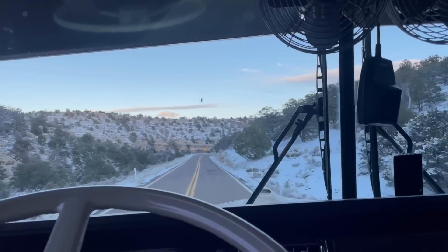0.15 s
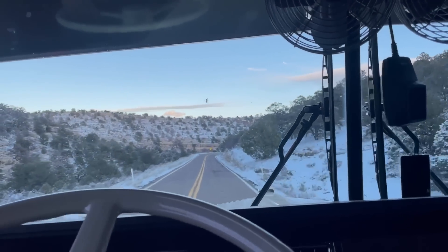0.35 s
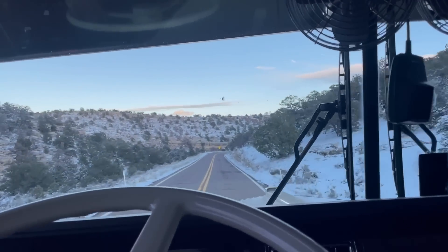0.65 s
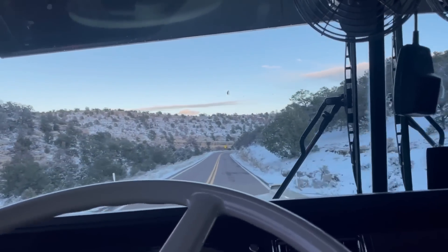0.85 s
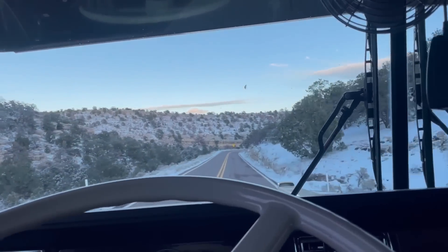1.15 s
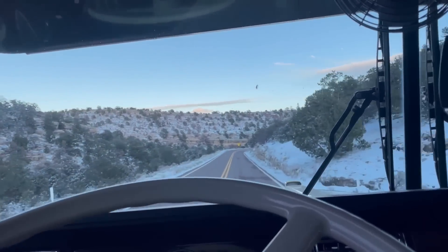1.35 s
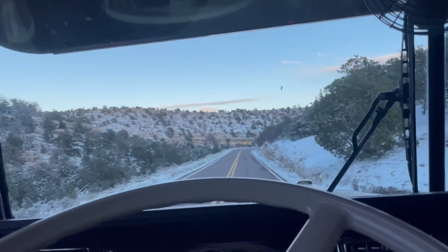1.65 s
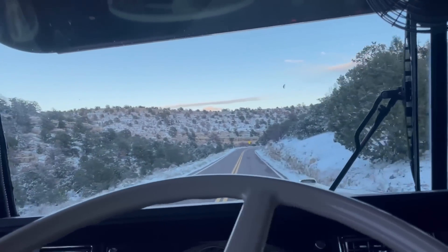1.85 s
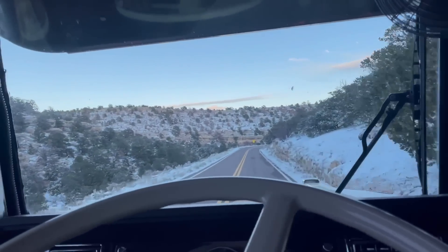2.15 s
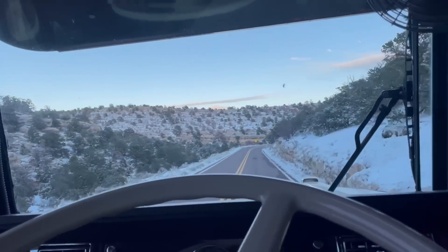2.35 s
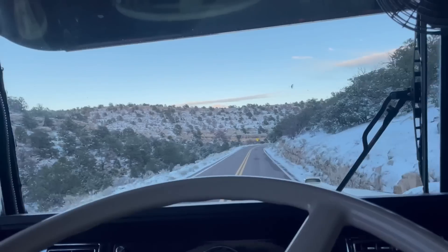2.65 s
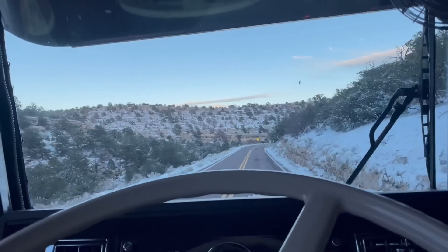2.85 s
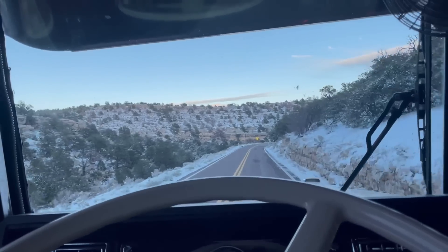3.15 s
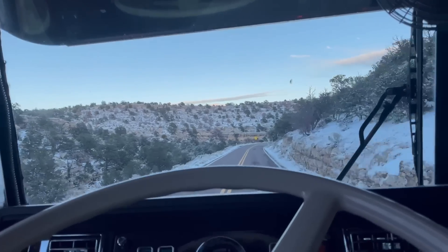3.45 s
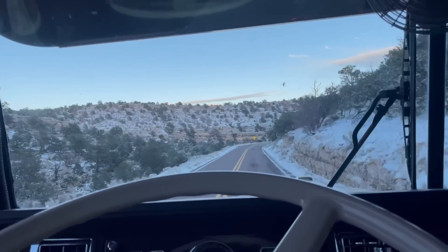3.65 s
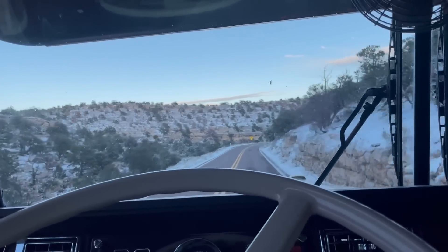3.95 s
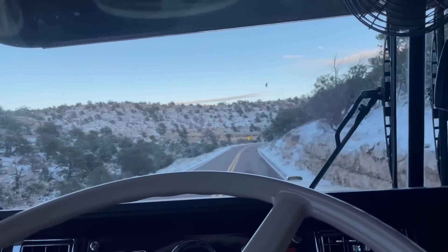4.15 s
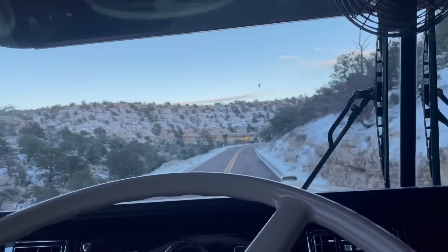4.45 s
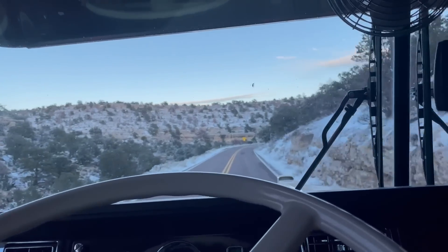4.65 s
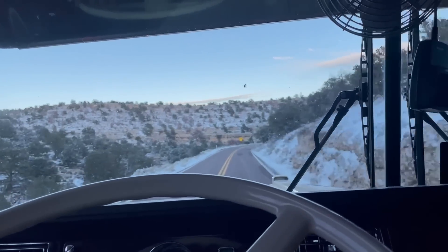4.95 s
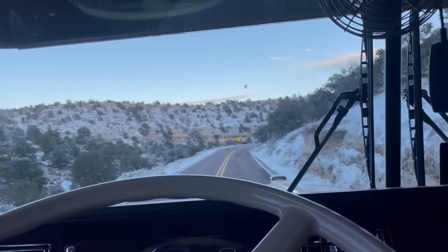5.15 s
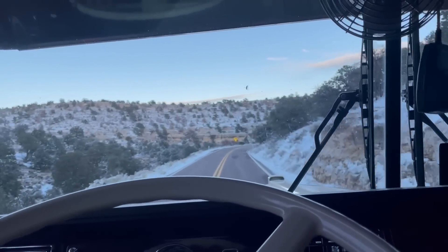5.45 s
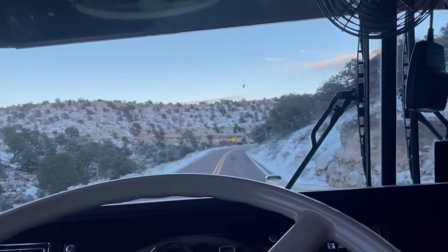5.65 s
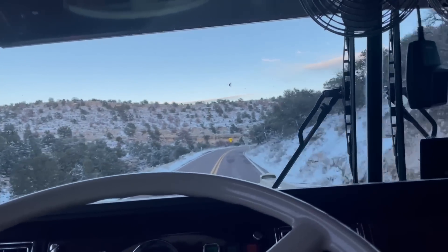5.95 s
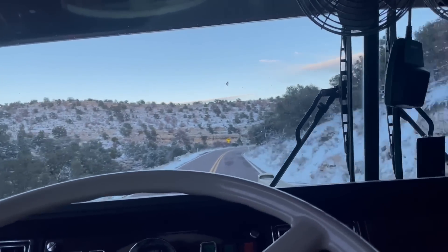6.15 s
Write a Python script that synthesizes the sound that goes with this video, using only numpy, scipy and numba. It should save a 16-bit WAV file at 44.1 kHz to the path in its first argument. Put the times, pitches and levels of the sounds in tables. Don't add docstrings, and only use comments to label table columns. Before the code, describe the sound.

Close stereo perspective inside an enclosed truck cab on a road. The loaded diesel hums deeply, then the throttle closes and the sound sinks to dull rolling noise, with joints gently rocking the cab. A brief gas hiss leads suddenly into the compression brake: rapid, uneven, metallic barking with thumps beneath, dipping slightly midway, then holding strong until it cuts off.

```python
import sys
import numpy as np
from scipy import signal
from scipy.fft import rfft, irfft
from scipy.io import wavfile
from scipy.ndimage import uniform_filter1d
from numba import njit

SR = 44100
rng = np.random.default_rng(int(sys.argv[2]) if len(sys.argv) > 2 else 0)


def invert_db(level):
    return 10 ** (np.asarray(level, dtype=float) / 20)


def materialize(psi):
    bounded = np.clip(np.atleast_2d(psi).T, -1, 1)
    quanta = np.round(bounded * 32767).astype(np.int16)
    wavfile.write(sys.argv[1], SR, quanta)


N = 277830
T = np.arange(N) / SR
HZ = np.fft.rfftfreq(N, 1 / SR)

# time in seconds, engine cycles turned (six firings a cycle).
CRANK = [
    (0, -50.58),
    (.5, -44.73),
    (1.5, -32.97),
    (4.1937, -1),
    (4.5293, 3),
    (4.866, 7),
    (5.204, 11),
    (5.5435, 15),
    (5.8845, 19),
    (6.3131, 24),
]
# time in seconds, level in dB under full.
LOAD = [
    (0, 0.5),
    (.55, -1.5),
    (1.0, -3),
    (1.5, -3.5),
    (1.7, -11.5),
    (2.0, -20),
    (4.2, -14),
    (4.35, -4),
    (4.5, -1.5),
    (6.3, -0.5),
]
# time in seconds, level in dB.
BRAKE_PRESSURE = [
    (4.25, -7.5),
    (4.33, -1.5),
    (4.55, -1),
    (5.15, -5),
    (5.6, -4.5),
    (6.3, -3),
]
# thump in dB, blast in dB, crack in dB, change as the brake warms
# in dB, lag through the manifold branch in ms.
CYLINDERS = [
    (1, 0, 0, 2.1, 0.066),
    (-4.5, 0, 3, 1.5, 0.21),
    (-1.5, -5.5, -17.5, -3.6, -0.24),
    (-16, -18.5, -22, 0.5, 0.73),
    (-1.5, 0.5, 4, -9.5, 0.15),
    (-3.5, -2, 2, -3, -0.17),
]
STAGES_S = [4.41, 4.46, 4.9, 5.7]
# frequency in Hz, level in dB, t60 in seconds.
THUMP_MODES = [(111, -10.5, 0.19), (165.3, 1, 1), (222.3, -4, 0.55)]
# frequency in Hz, level in dB, t60 in seconds.
STACK_MODES = [(344.2, -0.5, 0.28), (377.4, 0.5, 0.52), (448.7, 0, 0.13), (515.9, 3, 0.085),
               (555, -4.5, 0.12), (656, -6, 0.047), (777, -10, 0.051), (861.7, -11, 0.24), (947, -12, 0.04)]
# frequency in Hz, level in dB, t60 in seconds.
CRACK_MODES = [(1072, -0.5, 0.3), (1244.5, 6, 0.2), (1290, 1.5, .07), (1457, 8.5, 0.12), (1636, -4, 0.065),
               (1802, 2, 0.1), (2340, -6.5, 0.017), (3300, -11, .025), (1784, 4.5, 0.0045),
               (3440, -23, 0.009)]
# frequency in Hz, level in dB per Hz.
GAS_SPECTRUM = [(500, -14), (1200, -14), (1900, -13), (3500, -20), (4000, -24), (5400, -28), (6000, -33),
                (9000, -33), (12500, -36), (14500, -40), (15500, -50)]
# pulling in dB, braking in dB, rise in dB per dB of load.
FIRING_ORDERS = [(-13, -13, 0.79), (-21.5, -19.5, 0.92), (-36.5, -29, 1.3)]
# frequency in Hz, level in dB, wander in Hz, rise in dB per dB of load.
WHINES = [(106.5, -35.5, 2.5, 0), (166, -41, 2.0, 0), (237, -36.5, .6, .4), (335, -44, 1.5, .5),
          (657, -41, 1.5, .5), (1147, -49, 1.5, 0), (1195, -61, 3.0, 0), (1626, -55, 3.0, .6)]
# time in seconds, level in dB, length in seconds.
RATTLES = [(0.161, -49.5, 0.01), (0.242, -64, 0.014), (0.343, -52, 0.026), (0.513, -54, 0.016),
           (0.602, -61, .015), (0.707, -62.5, 0.017), (1.38, -52.5, .012), (1.476, -61.5, 0.01),
           (1.94, -49, 0.012), (2.377, -65, 0.0062), (4.03, -59.5, 0.0077)]
RATTLE_BAND_HZ = [10300, 13000]
# time in seconds, level in dB, frequency in Hz, length in seconds.
SQUEAK = (.684, -41, 2550, .009)
# start in seconds, length in seconds, level in dB.
BUMPS = [(0.031, 0.049, -31.5), (0.283, 0.102, -24.5), (0.97, 0.044, -22), (1.514, 0.13, -31),
         (1.793, 0.067, -20.5), (2.336, 0.23, -20), (2.802, 0.027, -25), (2.918, 0.45, -19),
         (3.379, 0.038, -25.5), (3.507, 0.15, -30), (3.797, 0.52, -20)]
# frequency in Hz, level in dB per Hz.
RUMBLE_SPECTRUM = [(18, -44.5), (35, -5), (55, 11.5), (68, 1.5), (85, -17.5), (120, -46)]
# frequency in Hz, level in dB per Hz.
ROAR_SPECTRUM = [(60, -13), (115, -3), (170, -10.5), (270, -18.5), (500, -17), (1150, -27.5), (1500, -34.5),
                 (3500, -43.5), (3900, -48), (5300, -49.5), (5800, -57.5), (7200, -50), (12500, -57.5),
                 (15500, -67.5)]
RUMBLE_DB = [-32.5, -32, -35.5]
ROAR_DB = [-35, -34, -31]
COAST_S = [1.4, 1.9]
# frequency in Hz, share of power common to both ports.
LIKENESS = [(50, .99), (150, .93), (500, 0.44), (2000, 0.45), (4500, 0.35), (7800, 1.01), (9400, 1.01),
            (13000, 0.93)]
# frequency in Hz, lead of the left port in radians.
PORT_PHASE = [(0, 0), (80, .15), (150, .65), (380, 2.0), (520, 1.3), (800, 1.7), (1380, 3.7), (2150, 6.5),
              (2840, 8.1), (3620, 7.0), (5080, 7.0), (6030, 5.0), (7900, 3.14), (9400, 3.14), (12300, .2)]
# frequency in Hz, left minus right in dB.
PORT_BALANCE = [(60, -2), (110, 8), (200, 0.5), (380, 8.5), (700, 2), (1290, 8), (2380, 5), (4400, 6.5),
                (7500, 4.7), (15000, -1.2)]

BLAST_DB, CRACK_DB, GAS_DB = -14, -26, -43
BLAST_PER_DB, GAS_PER_DB = 0.71, 1.66
BRAKE_ON_S, BRAKE_RISE_S = 4.24, .07
EVEN_AT_FIRST = 0.93
STEADY_GAS = 0.21
GAS_LEAD_S = .04
COLD_PITCH, WARM_UP_S = .92, .04
ROCK_HZ = 55.6
CEILING = .93


def curve(table):
    s, value = np.transpose(table)
    return np.interp(T, s, value)


def on_log_hz(table, hz):
    at, value = np.transpose(table)
    return np.interp(np.log(np.maximum(hz, 1)), np.log(at), value)


def by_state(pulling, coasting, held):
    rolling = np.interp(T, COAST_S, [pulling, coasting])
    braking = np.clip((T - BRAKE_ON_S) / (STAGES_S[1] - BRAKE_ON_S), 0, 1)
    return rolling + braking * (held - rolling)


def walk(rate):
    k = int(SR / rate)
    held = np.repeat(rng.standard_normal(N // k + 1), k)
    return 1.22 * uniform_filter1d(uniform_filter1d(held, k), k)[:N]


def unit(x):
    return x / np.sqrt(np.mean(x[..., -2 * SR:] ** 2))


def band_rms(x, lo_hz, hi_hz):
    return np.sqrt(np.mean(irfft(rfft(x) * (HZ > lo_hz) * (HZ < hi_hz), N) ** 2))


def bandpass(x, order, lo_hz, hi_hz):
    return signal.sosfilt(signal.butter(order, [lo_hz, hi_hz], "band", fs=SR, output="sos"), x)


def air(spectrum, flicker_db, rate):
    common, left, right = (rfft(rng.standard_normal(N)) for _ in range(3))
    share = np.clip(on_log_hz(LIKENESS, HZ), 0, 1)
    mixed = np.sqrt(share) * common + np.sqrt(1 - share) * np.array([left, right])
    both = invert_db(on_log_hz(spectrum, HZ)) * mixed
    octave = np.log2(np.maximum(HZ, 16) / 16)
    out = 0
    for centre in np.arange(21) / 2:
        window = np.cos(np.pi * np.clip(octave - centre, -1 / 2, 1 / 2)) ** 2
        out = out + invert_db(flicker_db * walk(rate)) * irfft(both * window, N)
    return out


@njit
def resonate(x, pole):
    z, y = 0j, np.empty(len(x))
    for i in range(len(x)):
        z = z * pole[i] + x[i]
        y[i] = z.imag
    return y


def ring(x, modes, sign, pitch=np.ones(N)):
    out, on = np.zeros(N), slice(int(BRAKE_ON_S * SR), N)
    for k, (hz, db, t60) in enumerate(modes):
        pole = np.exp(2j * np.pi * hz * pitch[on] / SR - np.log(1000) / (t60 * SR))
        out[on] += sign ** k * invert_db(db) / np.sqrt(t60) * resonate(x[on], pole)
    return out


def cab(x, echo_s, echo_db, t60, wet_db):
    lag = np.arange(int(.15 * SR))
    decay = invert_db(-60 * lag / SR / t60) / np.sqrt(t60 * SR / 14)
    response = invert_db(wet_db) * rng.standard_normal((2, len(lag))) * decay
    response[:, 0] = 1
    response[:, int(echo_s * SR)] += invert_db(np.array(echo_db))
    return signal.fftconvolve(x[None], response)[:, :N]


def pulses(at, db, lag_ms=0):
    place = np.minimum(at + lag_ms * SR / 1000, N - 1)
    x, i = np.zeros(N + 1), place.astype(int)
    x[i], x[i + 1] = invert_db(db) * (i + 1 - place), invert_db(db) * (place - i)
    return x[:N]


def escaping_gas(at, opening_db):
    rush = signal.lfilter([1], [1, -np.exp(-1 / (.016 * SR))], pulses(at, opening_db))
    rush = uniform_filter1d(rush, size=60, origin=29)
    gas = air(GAS_SPECTRUM, 1.0, 5.4)
    return gas / band_rms(gas[0], 3500, 7000) * (STEADY_GAS + unit(rush))


def brake(firing):
    count = np.arange(int(firing[-1]))
    at = np.interp(count, firing, np.arange(N))
    at_s = at / SR
    uneven = 1 - EVEN_AT_FIRST * np.interp(at_s, STAGES_S[:2], [1, 0])
    late = np.interp(at_s, STAGES_S[2:], [0, 1])
    thump_db, blast_db, crack_db, fade_db, lag_ms = np.array(CYLINDERS)[count % 6].T

    spread_db = .5 + 1.5 * np.exp(-(at_s - 4.28) / .3)
    ragged = rng.standard_normal((len(count), 2)) * spread_db[:, None]
    thump_db = thump_db + .5 * ragged[:, 0]
    blast_db = uneven * blast_db + late * fade_db + ragged[:, 0]
    opening_db = uneven * crack_db + late * fade_db + ragged[:, 1]

    thump = ring(pulses(at, thump_db), THUMP_MODES, sign=-1)
    thump = unit(cab(thump, 0.0016, [-20, -12], 0.009, -17))

    warming_s = np.maximum(T - BRAKE_ON_S - GAS_LEAD_S, 0)
    pitch = 1 - (1 - COLD_PITCH) * np.exp(-warming_s / WARM_UP_S)
    blast = ring(pulses(at, blast_db, lag_ms + .4), STACK_MODES, sign=1, pitch=pitch)
    blast = unit(cab(blast, 0.00595, [-16, -5], 0.06, -16))
    blast = bandpass(blast, 2, 310, 1400)

    crack = ring(pulses(at, opening_db, -.4), CRACK_MODES, sign=1)
    crack = unit(cab(crack, .006, [-16, -1], .05, -8))

    push_db = curve(BRAKE_PRESSURE)
    shocks = invert_db(BLAST_DB + BLAST_PER_DB * push_db) * (blast + invert_db(-2.0) * thump)
    shocks = shocks + invert_db(CRACK_DB + push_db) * crack
    shocks = bandpass(shocks, 3, 75, 5800)

    gas = escaping_gas(at, (1 + .5 * late) * opening_db)
    shocks_on = np.clip((T - BRAKE_ON_S) / BRAKE_RISE_S, 0, 1)
    gas_on = np.clip((T + GAS_LEAD_S - BRAKE_ON_S) / BRAKE_RISE_S, 0, 1)
    return shocks_on * shocks + gas_on * invert_db(GAS_DB + GAS_PER_DB * push_db) * gas


def boom(firing):
    dip, load_db = 2 * np.pi * (firing - .53), curve(LOAD)
    out = 0
    for order, (pull_db, held_db, per_db) in enumerate(FIRING_ORDERS, 1):
        level_db = by_state(pull_db, pull_db, held_db) + per_db * load_db + 0.09 * walk(2.2)
        out = out - np.sqrt(2) * invert_db(level_db) * np.cos(order * dip)
    return out


def knock(firing):
    load_db = np.interp(T, [0, 1.45, 1.8], [0.5, -1.5, -30])
    clatter = bandpass(rng.standard_normal((2, N)), 2, 520, 1350)
    burst = .5 + 0.72 * np.exp(-(firing % 1) / 1.1)
    return invert_db(load_db - 41.5) * unit(clatter) * burst


def whines(firing):
    load_db = np.minimum(curve(LOAD) + 1.5, 0)
    out = 0
    for hz, db, wander_hz, rise in WHINES:
        phase = 2 * np.pi * (firing * hz / 70.7 + np.cumsum(wander_hz * walk(6)) / SR)
        level_db = db + rise * load_db + 1.2 * walk(5)
        out = out + invert_db(level_db) * np.sqrt(2) * np.sin(phase)
    return out


def rattles():
    buzz = bandpass(rng.standard_normal(N), 2, *RATTLE_BAND_HZ)
    shakes = sum(invert_db(db) * np.exp(-((T - s) / length) ** 2) for s, db, length in RATTLES)
    s, db, hz, length = SQUEAK
    squeak = invert_db(db) * np.sin(2 * np.pi * hz * T) * np.exp(-((T - s) / length) ** 2)
    return shakes * buzz + squeak


def road():
    rumble = rfft(rng.standard_normal(N)) * invert_db(on_log_hz(RUMBLE_SPECTRUM, HZ))
    rumble = irfft(rumble * (HZ < RUMBLE_SPECTRUM[-1][0]), N)
    rumble = invert_db(by_state(*RUMBLE_DB)) * rumble / band_rms(rumble, 30, 52)
    roar = air(ROAR_SPECTRUM, 0.61, 6.4)
    roar = invert_db(by_state(*ROAR_DB)) * roar / band_rms(roar[0], 306, 6000)
    rocks = 0
    for s, length, db in BUMPS:
        rocks = rocks + invert_db(db - 0.5) * np.exp(-((T - s - length / 2) / (0.56 * length)) ** 2)
    rocks = rocks * np.sin(2 * np.pi * np.cumsum(ROCK_HZ + 4.017 * walk(4)) / SR)
    return rocks + rumble + roar


def scene():
    firing = 6 * curve(CRANK)
    return brake(firing) + boom(firing) + knock(firing) + whines(firing) + rattles() + road()


def low_pass(x):
    return signal.sosfilt(signal.butter(12, 15630, fs=SR, output="sos"), x)


def record(dry):
    margin = SR // 10
    wide = np.pad(dry, ((0, 0), (margin, margin)), "reflect", reflect_type="odd")
    wide = wide * signal.windows.tukey(N + margin * 2, .03)
    hz = np.fft.rfftfreq(wide.shape[1], 1 / SR)
    at, lead = np.transpose(PORT_PHASE)
    half = invert_db(on_log_hz(PORT_BALANCE, hz) / 2)
    right = np.exp(-1j * np.interp(hz, at, lead)) / half
    ports = irfft(rfft(wide) * [half, right])[:, margin:margin + N]
    ports = ports * signal.windows.tukey(N, .003)
    mix = ports / (1 + (ports / CEILING) ** 4) ** (1 / 4)
    return low_pass(mix)


dry = scene()
out = record(dry)
materialize(out)
```